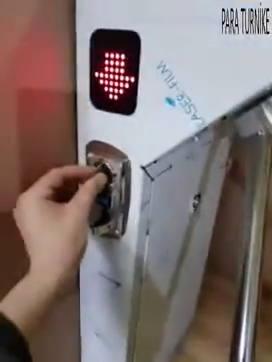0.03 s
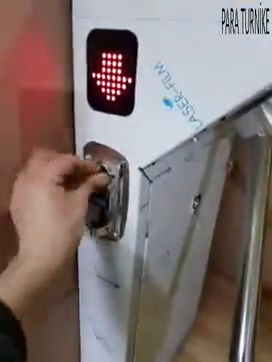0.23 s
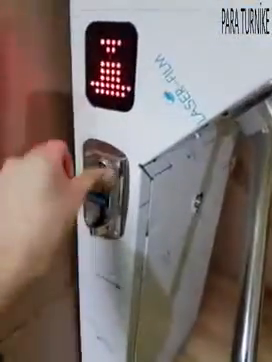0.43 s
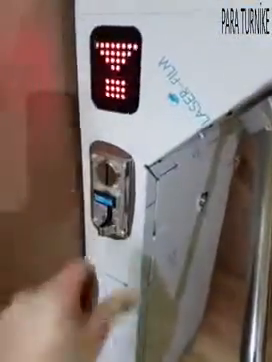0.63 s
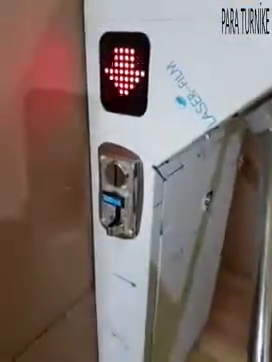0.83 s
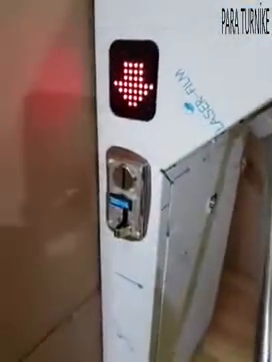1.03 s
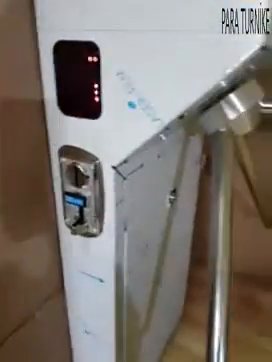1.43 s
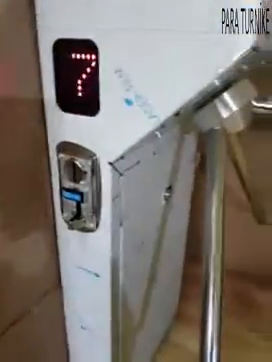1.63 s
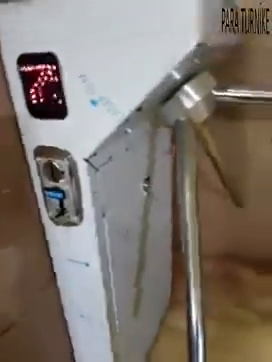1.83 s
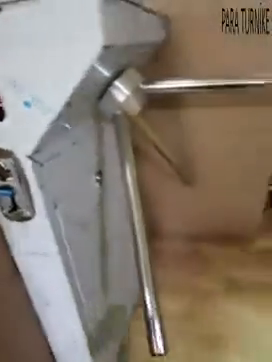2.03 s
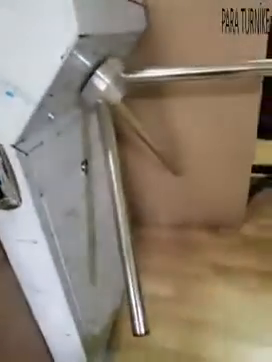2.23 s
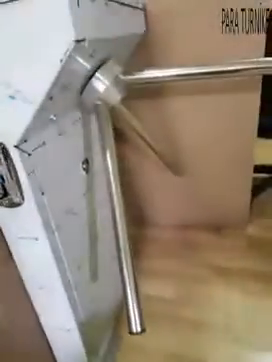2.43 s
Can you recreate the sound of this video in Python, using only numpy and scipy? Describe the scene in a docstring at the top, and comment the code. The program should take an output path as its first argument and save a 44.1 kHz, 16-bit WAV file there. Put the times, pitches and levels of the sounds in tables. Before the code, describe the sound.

A coin rattles through a steel turnstile, close by in a quiet room. It rubs the slot, thumps at about 0.25 seconds and clatters down, clacking loudest near 0.45 and leaving a faint metallic ring. A sleeve swishes alongside, and the latch clunks at 0.6. Soft rubs follow until 1.1. The arm ticks faintly at 1.4 and barely brushes around 2 seconds, over a low wavering hum.

```python
"""A coin goes into a steel turnstile, close by in a quiet room. Its rim rubs the slot, the front panel
thumps, and the coin rattles down the chute and clacks through the acceptor, leaving a steel part ringing.
The latch lets go at 0.6 s and a sleeve swishes as the hand draws back. Soft rubs follow; the arm ticks
at 1.4 s and brushes faintly as it turns, over room tone and a wavering mains hum."""
import sys
import numpy as np
from scipy import signal
from scipy.fft import rfft, irfft
from scipy.io import wavfile

SR = 44100
rng = np.random.default_rng(int(sys.argv[2]) if len(sys.argv) > 2 else 0)


def wav_out(sig):
    """Save sig, one row per channel (or a flat mono array), as 16-bit PCM at SR to the path in sys.argv[1]."""
    wavfile.write(sys.argv[1], SR, np.round(np.clip(np.atleast_2d(sig).T, -1, 1) * 32767).astype(np.int16))


N = 110250
T = np.arange(N) / SR
HZ = np.maximum(np.fft.rfftfreq(2 * N, 1 / SR), 1)


def coin_clicks():
    """Each contact is a noise burst in three bands: plate body, ringing steel, coin edge."""
    # (time [s], body [dB], steel [dB], edge [dB], left minus right [dB], decay [s])
    contacts = [(.007, -47, -46, -58.5, -4.5, .003), (.0985, -44.5, -56, -72, -4.5, .003),
                (0.1764, -47.5, -46, -61, -5, .012), (0.1976, -46, -30.5, -58, -4.5, .007),
                (.2305, -30.5, -41, -52.5, 0, .003), (0.2659, -10.5, -21, -33.5, -3.5, .003),
                (.291, -26, -29, -36, -0.5, .004), (.3025, -26.5, -23, -37.5, -1, .004),
                (.352, -31, -28, -36, 0, .005), (.369, -29.5, -28.5, -37, 4.5, .005),
                (.418, -27, -12.5, -9, 1.5, .0025), (.4235, -34.5, -24.5, -21.5, 4.5, .006),
                (0.453, -11.5, 1.5, -14.5, -3, 0.0018), (.4655, -28, -27.5, -32.5, 0.5, .004),
                (.4965, -24, -27, -35, -3, .004), (.504, -35.5, -20, -31.5, 1.5, .004),
                (0.515, -21, -24.5, -14, 3.5, 0.0031), (.522, -25, -33, -26.5, -2, .01),
                (.602, -27, -48, -46, -24, .005)]
    # band spectra (frequency [Hz], level [dB])
    body = [(200, -26.5), (500, -7.5), (700, 1), (930, 1.5), (1150, -12), (1600, -24.5), (3000, -45.5)]
    steel = [(700, -30.5), (1300, -20), (2000, -11.5), (2400, -1.5), (2950, 3), (3800, -5), (4700, -12.5),
             (5700, -11.5), (7000, -19), (16000, -47.5)]
    edge = [(2000, -23.5), (4500, -1), (6000, -0.5), (8000, 1), (10500, 0), (13000, 0), (16000, -3)]
    # per-channel over common noise (body [ratio], steel [ratio], edge [ratio])
    band_widths = [.7, 0.17, 2]
    width = np.array(band_widths)[:, None, None]
    rise_s = 0.0012
    t = T[:SR // 10]
    bursts = np.zeros((3, 2, N))
    for start_s, *band_db, pan_db, decay_s in contacts:
        noise = rng.standard_normal((3, 3, len(t)))
        stereo = (noise[:, :1] + width * noise[:, 1:]) / np.hypot(1, width)
        envelope = (1 - np.exp(-t / rise_s)) * np.exp(-t / decay_s)
        i = int(start_s * SR)
        bursts[:, :, i:i + len(t)] += stereo * envelope * pan(pan_db) * undb(band_db)[:, None, None]
    return sum(colour(burst, spectrum) for burst, spectrum in zip(bursts, (body, steel, edge)))


def coin_roll():
    """The rim scrapes along the track in dense, uneven grains."""
    levels = [(.165, -78.5), (.205, -42.5), (.255, -39.5), (.28, -32), (.34, -33.5), (.365, -26),
              (.44, -30), (.515, -27), (.56, -39), (.64, -38), (.8, -83)]  # (time [s], level [dB])
    spectrum = [(50, -8.5), (150, 4), (300, -2), (450, 4), (800, 0), (1300, -3.5), (2000, -1.5),
                (3000, -4.5), (4000, -6), (5500, -18), (8000, -22), (16000, -31.5)]  # (frequency [Hz], level [dB])
    grains_per_s, spread_db = 5000, 4
    grains = (rng.random(N) < grains_per_s / SR) * undb(spread_db * rng.standard_normal(N))
    scrape = diffuse(grains / np.std(grains) * curve(levels))
    return colour(scrape, spectrum) * pan(db=-0.5)


def acceptor(coin):
    """The coin rings the acceptor plates, then the hollow housing."""
    plate_modes = [(2335, -1, .2), (2531, -1, .18), (2724, -3, .15), (2968, -5, .1), (3600, 2, .16),
                   (3910, 0, .13), (4328, 1, .2), (5372, 0, .2), (5910, -3, .15)]  # (frequency [Hz], level [dB], t60 [s])
    plates_db, housing_db = -23.5, -5
    plates = coin + undb(plates_db) * through(coin, ring(plate_modes))
    return plates + undb(housing_db) * through(plates, diffuse() * fade(T, t60_s=0.2))


def panel_thumps():
    """Soft pushes bend the front panel in and out, and it booms."""
    blows = [(0.2345, -15, -25), (0.2874, -16.5, -15)]  # (time [s], push [dB], boom [dB])
    modes = [(87, 0, .18), (143, -14, .12)]  # (frequency [Hz], level [dB], t60 [s])
    push_s = 0.00098
    thumps = np.zeros(N)
    for start_s, push_db, boom_db in blows:
        u = (T - start_s) / push_s
        thumps += undb(push_db) * u * np.exp((1 - u ** 2) / 2)
        thumps += undb(boom_db) * ring(modes, start_s)
    return thumps


def chute():
    """Knocks build up the chute's low modes."""
    knocks = [(.348, -13), (.4525, -31.5), (.497, -31.5)]  # (time [s], level [dB])
    modes = [(146, -15, .55), (210, -1, .27), (239, 0, .3), (355, -13, .17), (393, -10, .27),
             (455, -13, .27), (571, -14, .2), (620, -4.5, .3), (815, -20, .2), (1179, -21, .15)]  # (frequency [Hz], level [dB], t60 [s])
    return struck(knocks, modes, rise_s=0.012)


def latch():
    """The latch lets go and settles, ringing at each hit."""
    hits = [(.6015, -23.5), (.6235, -39), (.672, -34)]  # (time [s], level [dB])
    modes = [(99, -10, .17), (196, -5, .2), (239, -8, .22), (401, -1, .21), (657, -7, .12), (702, -1, .11),
             (908, -8, .15), (1162, -17, .14), (1667, -19, .22)]  # (frequency [Hz], level [dB], t60 [s])
    return struck(hits, modes, rise_s=0.00067)


def steel_ring():
    """A lightly damped steel part rings on from the loudest clack."""
    modes = [(463.8, -3, 2.35), (1826, -14.5, .75), (1801, -16, 0.66)]  # (frequency [Hz], level [dB], t60 [s])
    return undb(-35.5) * ring(modes, start_s=0.453) * pan(db=-3)


def sleeve():
    """Cloth friction: a bright swish as the hand moves."""
    levels = [(.18, -73), (.255, -41.5), (.33, -34), (.38, -36), (.5, -36.5), (.6, -46), (.74, -46),
              (.785, -40), (.825, -39.5), (.865, -53.5), (.96, -67.5), (1.15, -92)]  # (time [s], level [dB])
    spectrum = [(60, 3), (200, -4), (1000, -6.5), (3000, -2.5), (4800, 2.5), (6500, 0), (9500, -3),
                (12000, 2), (13500, -4), (16000, -7.5)]  # (frequency [Hz], level [dB])
    return colour(diffuse(), spectrum) * curve(levels) * pan(db=3.5)


def slot_rub():
    """The coin's rim rubs the mouth of the slot, which rings faintly."""
    levels = [(0, -54.5), (.02, -51.5), (.06, -57), (.115, -58.5), (.16, -67), (.2, -89)]  # (time [s], level [dB])
    spectrum = [(180, -5.5), (280, -15), (430, -3), (600, 1), (830, -2), (1050, -1.5), (1600, -16.5),
                (2300, -19.5), (3100, -11.5), (4200, -20), (6000, -34.5), (16000, -41)]  # (frequency [Hz], level [dB])
    modes = [(433, -8, .4), (660, -5, .4), (830, -2, .45), (980, 0.5, .35), (1150, -7.5, .3),
             (2930, -7, 0.11), (3500, -7.5, .12)]  # (frequency [Hz], level [dB], t60 [s])
    friction = diffuse() * curve(levels)
    mouth = undb(-5) * through(friction, ring(modes))
    return (colour(friction, spectrum) + mouth) * pan(db=-2)


def soft_rubs():
    """Two dull strokes of friction."""
    strokes = [(0.796, 0.13, -48.5, -3.5), (1.055, 0.081, -59, -5)]  # (peak [s], half length [s], level [dB], left minus right [dB])
    spectrum = [(200, 5.5), (600, 1), (1000, -4), (1400, 3.5), (2000, 3.5), (2800, 1), (4000, -1),
                (7000, -9.5), (11000, -19.5), (16000, -18)]  # (frequency [Hz], level [dB])
    return swells(strokes, spectrum)


def arm_tick():
    """The arm takes up its play with a faint tick."""
    hits = [(1.399, -61.5)]  # (time [s], level [dB])
    modes = [(1228, -5.5, 0.044), (1330, -3, 0.042), (1560, -3, 0.03), (2360, -16, 0.026),
             (3100, -4, 0.032), (4320, -9, .04)]  # (frequency [Hz], level [dB], t60 [s])
    return struck(hits, modes, rise_s=0.0011)


def arm_swishes():
    """Faint, hollow brushing as the arm turns."""
    strokes = [(1.71, 0.052, -76.5, -7), (2.05, 0.11, -62.5, -6), (2.165, 0.06, -71, -7.5)]  # (peak [s], half length [s], level [dB], left minus right [dB])
    spectrum = [(300, 4), (700, -11), (1250, 3), (2000, -1.5), (2850, -7.5), (4000, 2), (6000, -1),
                (9000, -6), (12500, -5), (16000, -14.5)]  # (frequency [Hz], level [dB])
    return swells(strokes, spectrum)


def reverb(x):
    """Diffuse room tail with a decay time per band."""
    decays = [(80, 0.55), (300, 0.74), (1000, 0.61), (3000, 0.59), (7000, 0.23), (14000, .5)]  # (frequency [Hz], t60 [s])
    band_hz, band_t60_s = np.array(decays).T
    rise_s = 0.0079
    noise = rfft(diffuse(), 2 * N)
    tail = np.zeros((2, N))
    for share, t60_s in zip(np.eye(len(band_hz)), band_t60_s):
        band = np.interp(np.log(HZ), np.log(band_hz), share)
        tail += irfft(noise * band)[:, :N] * fade(T, t60_s)
    return through(x, tail * (1 - np.exp(-T / rise_s)))


def mains_hum():
    """One low tone, wavering in pitch and level."""
    levels = [(0, -65), (.92, -70), (1.1, -56), (1.2, -60.5), (1.3, -75), (1.44, -62), (1.7, -60.5),
              (1.9, -82.5), (2.03, -64), (2.24, -62.5), (2.3, -74), (2.38, -73), (2.5, -69.5)]  # (time [s], level [dB])
    hum_hz, depth = 102, 0.014
    wander = np.interp(T, np.linspace(0, T[-1], 30), rng.standard_normal(30))
    phase = 2 * np.pi * np.cumsum(hum_hz * (1 + depth * wander)) / SR
    return np.sqrt(2) * np.sin(phase) * curve(levels)


def room_tone():
    """Steady, bass-heavy noise."""
    spectrum = [(25, -2.5), (60, 3), (120, 8.5), (220, -3), (400, -7), (700, -18), (1500, -19),
                (4000, -21.5), (8000, -25), (12000, -21.5), (16000, -19)]  # (frequency [Hz], level [dB])
    return undb(-66) * colour(diffuse(), spectrum)


def undb(db):
    """Decibels to gain."""
    return 10 ** (np.asarray(db) / 20)


def curve(levels):
    """Gain over time through (time [s], level [dB]) points."""
    return undb(np.interp(T, *np.array(levels).T))


def pan(db):
    """Stereo gains, left minus right = db."""
    return undb(np.array([[db], [-db]]) / 2)


def fade(t, t60_s):
    """Decay of 60 dB in t60_s."""
    return np.exp(-np.log(1000) * t / t60_s)


def colour(x, spectrum):
    """Minimum-phase filter of unit power through (frequency [Hz], level [dB]) points."""
    hz, db = np.array(spectrum).T
    gain = undb(np.interp(np.log(HZ), np.log(hz), db))
    cepstrum = irfft(np.log(gain / np.sqrt(np.mean(gain ** 2))))
    cepstrum[1:N] *= 2
    cepstrum[N + 1:] = 0
    return irfft(rfft(x, 2 * N) * np.exp(rfft(cepstrum)))[..., :N]


def diffuse(envelope=1):
    """Stereo white noise under an envelope, alike in the bass, unrelated in the treble."""
    bass_correlation, corner_hz = 0.82, 650
    correlation = bass_correlation / (1 + (HZ / corner_hz) ** 4)
    mid, side = rfft(rng.standard_normal((2, N)) * envelope, 2 * N)
    mid *= np.sqrt((1 + correlation) / 2)
    side *= np.sqrt((1 - correlation) / 2)
    return irfft(np.array([mid + side, mid - side]))[:, :N]


def ring(modes, start_s=0):
    """Damped modes struck at start_s, alternating in sign."""
    t = np.maximum(T - start_s, 0)
    return sum((-1) ** k * undb(db) * np.sin(2 * np.pi * hz * t) * fade(t, t60_s)
               for k, (hz, db, t60_s) in enumerate(modes))


def struck(hits, modes, rise_s):
    """Blows on one object; each ring builds over rise_s."""
    return sum(undb(db) * ring(modes, start_s) * (1 - np.exp(-np.maximum(T - start_s, 0) / rise_s))
               for start_s, db in hits)


def swells(strokes, spectrum):
    """Friction noise under one Gaussian swell per stroke."""
    envelope = sum(undb(db) * pan(pan_db) * np.exp(-((T - peak_s) / half_s) ** 2)
                   for peak_s, half_s, db, pan_db in strokes)
    return colour(diffuse(), spectrum) * envelope


def through(x, response):
    """Convolve with a response scaled to unit energy."""
    response = np.atleast_2d(response)
    energy = np.mean(np.sum(response ** 2, axis=1))
    return signal.fftconvolve(x, response / np.sqrt(energy), axes=1)[:, :N]


def scene():
    """Coin, panel and cabinet feed the reverb; the rest stays dry."""
    coin = acceptor(coin_clicks() + coin_roll())
    thumps = panel_thumps()
    cabinet = chute() + latch() + arm_tick()
    echo = reverb(undb(-14.5) * coin + undb(-11) * cabinet + undb(-12.5) * thumps)
    friction = slot_rub() + sleeve() + soft_rubs() + arm_swishes()
    return coin + thumps + cabinet + steel_ring() + friction + echo + mains_hum() + room_tone()


def record(dry):
    """Bass cut, soft clip, treble cut."""
    low_hz, ceiling, top_hz = 31.7, 1.3, 15800
    thinned = signal.sosfilt(signal.butter(2, low_hz, "high", fs=SR, output="sos"), dry)
    rounded = ceiling * np.tanh(thinned / ceiling)
    return signal.sosfilt(signal.ellip(10, .2, 70, top_hz, fs=SR, output="sos"), rounded)


dry = scene()
out = record(dry)
wav_out(out)
```